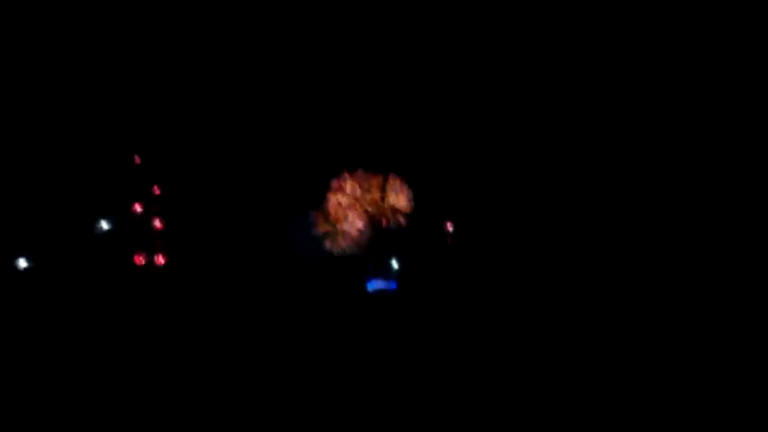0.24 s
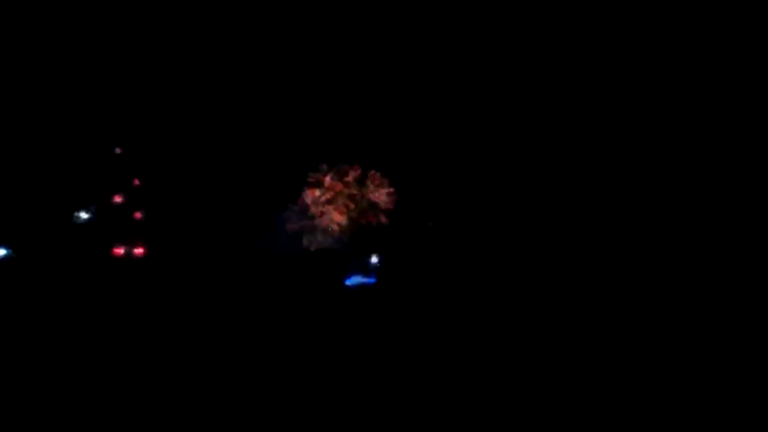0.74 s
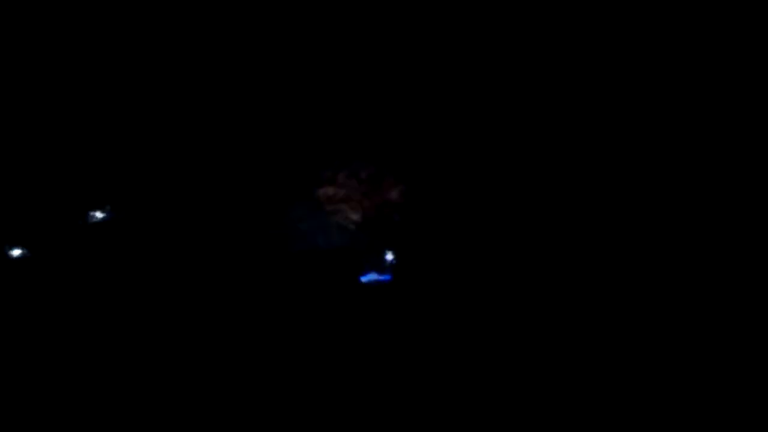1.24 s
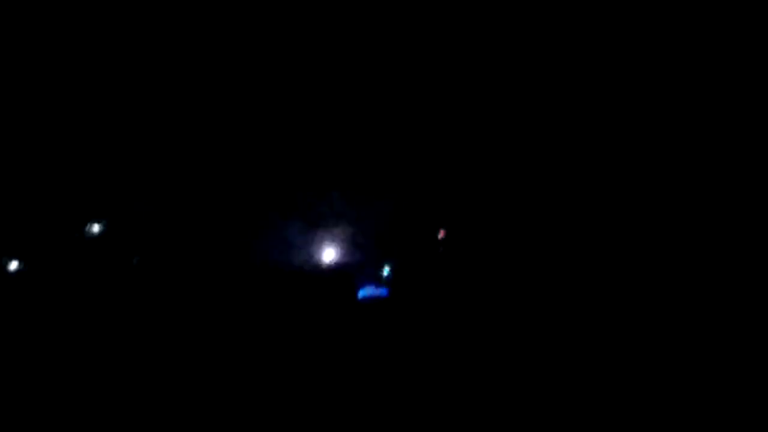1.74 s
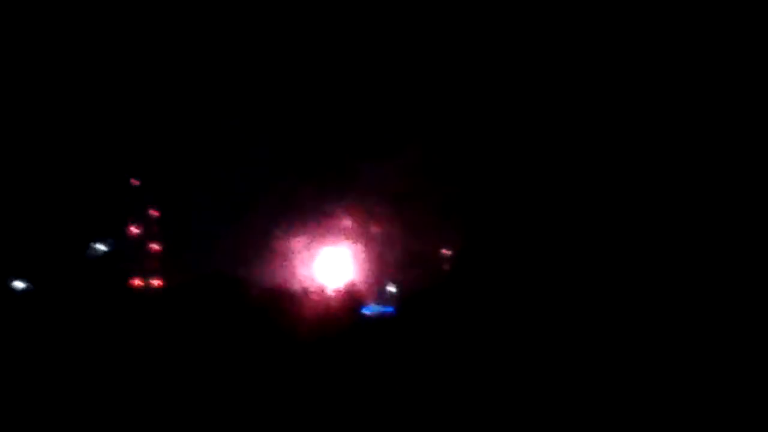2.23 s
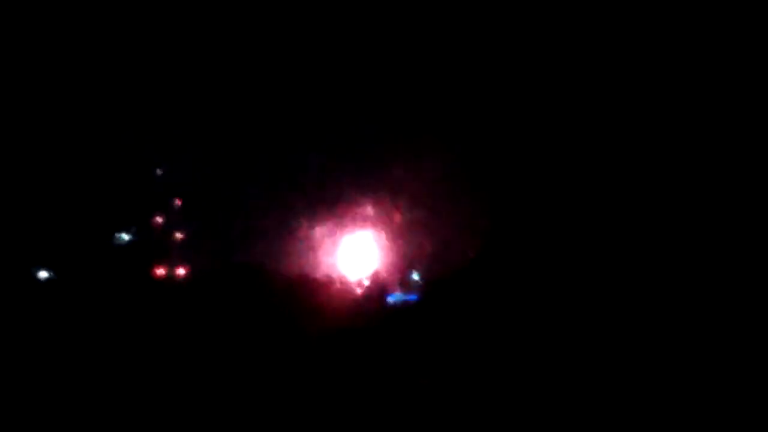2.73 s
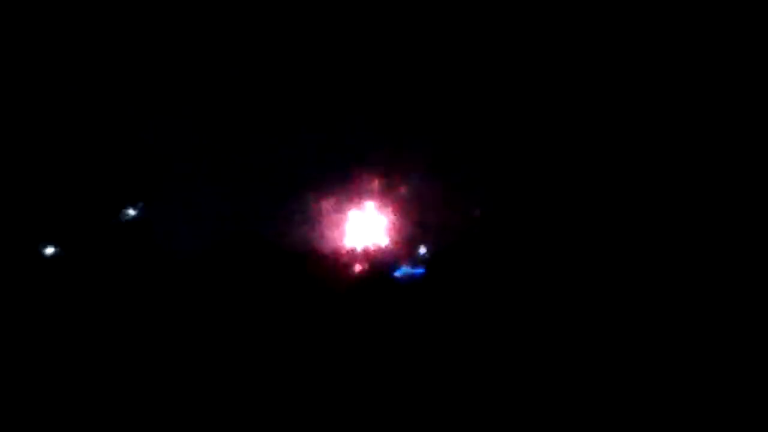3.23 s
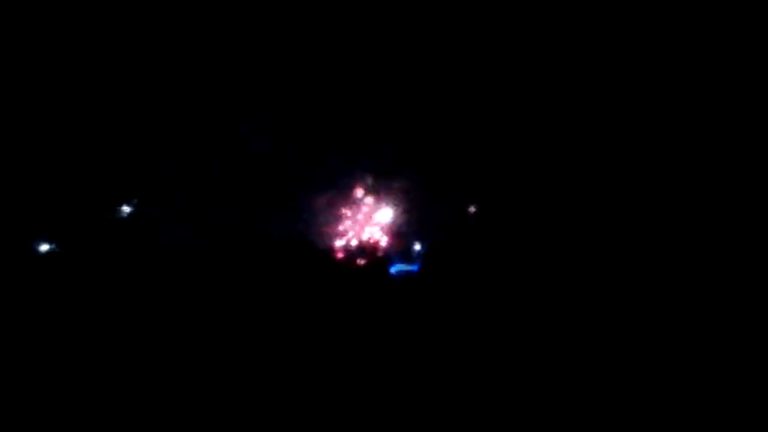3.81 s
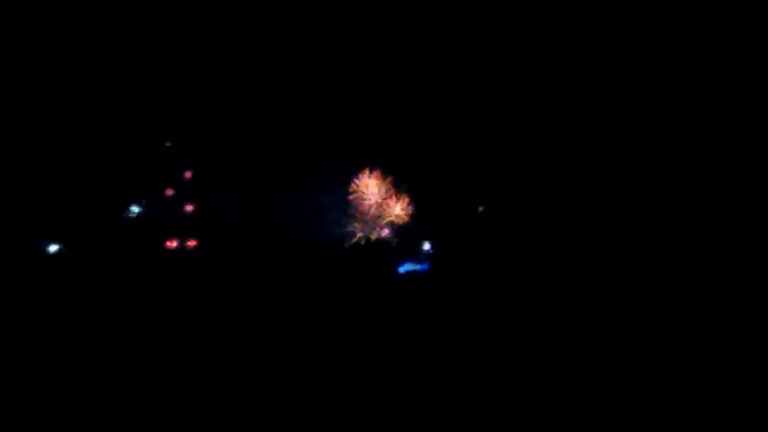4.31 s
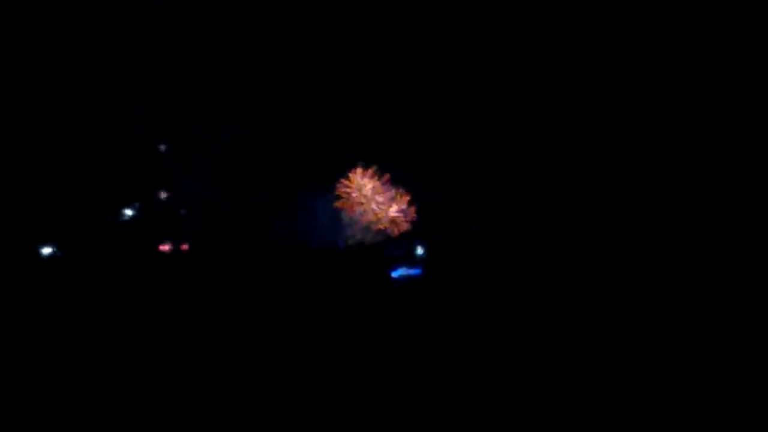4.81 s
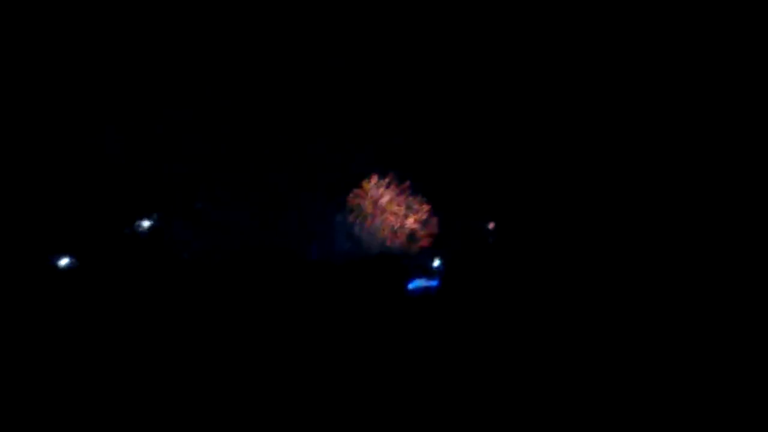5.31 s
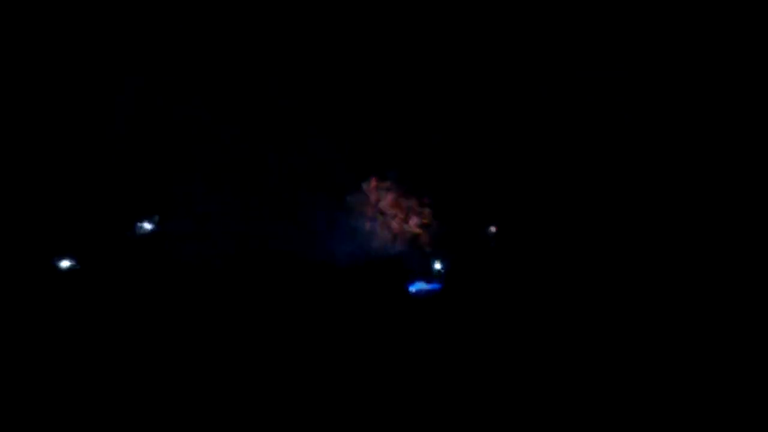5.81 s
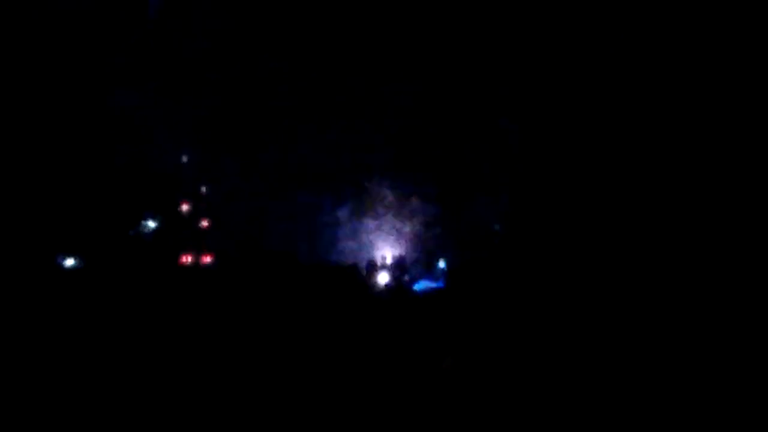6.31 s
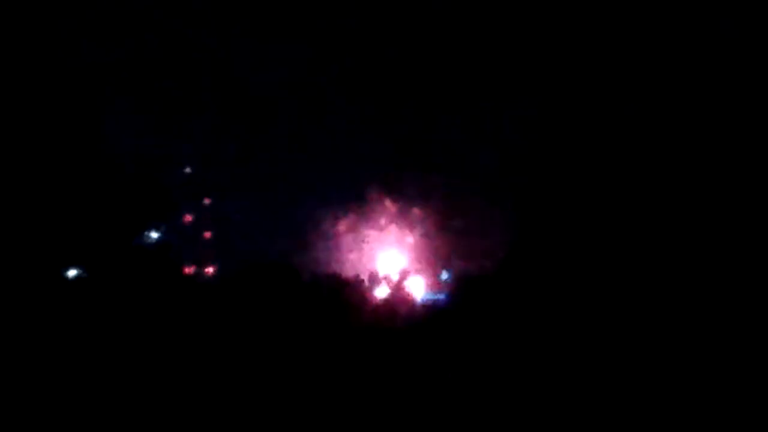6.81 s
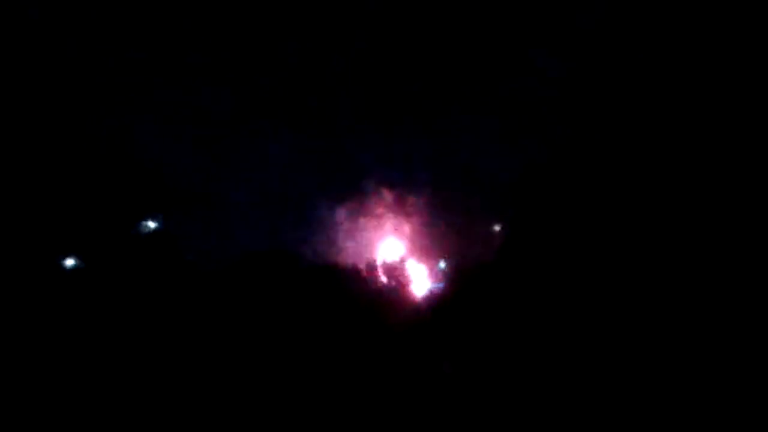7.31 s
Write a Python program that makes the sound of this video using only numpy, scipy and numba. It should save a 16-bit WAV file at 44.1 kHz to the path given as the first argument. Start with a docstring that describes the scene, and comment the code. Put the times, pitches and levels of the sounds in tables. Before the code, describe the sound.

Distant firework shells thump and crack at night in irregular clusters, echoing and rolling away over a low rumble, with camera hiss and motor whirr.

```python
"""Firework shells burst far off at night: each thump is a pressure pulse with a crack and clatter made of
scattered copies. It echoes from a house front and rolls away over a rumble of noise and random far thuds.
A small camera adds noise: steady hiss, narrow whines and short runs of its focus motor. Its gain control
ducks when a thump is too loud and creeps back up, so the quiet sounds swell between the bursts.
The bass is largely opposite in the two channels."""
import sys
import numpy as np
from scipy import signal
from scipy.fft import rfft, irfft
from scipy.io import wavfile
from scipy.ndimage import uniform_filter1d, minimum_filter1d
from numba import njit

SR = 44100
rng = np.random.default_rng(int(sys.argv[2]) if len(sys.argv) > 2 else 0)


def transcribe(signal):
    """Save signal, clipped to [-1, 1], as a 16-bit WAV file at the path in sys.argv[1]."""
    frames = np.atleast_2d(signal).T
    limited = np.clip(frames, -1, 1)
    pcm = np.round(limited * 32767).astype(np.int16)
    wavfile.write(sys.argv[1], SR, pcm)


N = 332955
TIME = np.arange(N) / SR  # seconds


def undb(db):
    """Turn decibels into a gain."""
    return 10 ** (np.asarray(db) / 20)


def unit(x):
    """Scale to an rms (average strength) of 1."""
    return x / np.sqrt(np.mean(x ** 2))


def colour(x, points, size=8192):
    """Filter through (Hz, dB) points without any sound ahead of time, built from the cepstrum of the gain."""
    hz, db = np.transpose(points)
    bins = np.maximum(np.arange(size // 2 + 1) * SR / size, 1)
    gain = undb(np.interp(np.log(bins), np.log(hz), db))
    cepstrum = irfft(np.log(gain))
    # folding the second half onto the first makes the filter respond as early as it can
    cepstrum[1:size // 2] *= 2
    cepstrum[size // 2 + 1:] = 0
    response = irfft(np.exp(rfft(cepstrum)))[:size // 2]
    return signal.fftconvolve(x, response)[:len(x)]


def noise(points):
    """Make noise of the given colour, rms 1."""
    return unit(colour(rng.standard_normal(N), points))


def band(x, hz, q):
    """Pass x through one resonance, gain 1 at its centre."""
    return signal.lfilter(*signal.iirpeak(hz, q, fs=SR), x)


def walk(rate):
    """Make random levels, held for 1 / rate seconds and smoothed twice; rms 1."""
    hold = int(SR / rate)
    steps = np.repeat(rng.standard_normal(N // hold + 1), hold)
    smooth = uniform_filter1d(uniform_filter1d(steps, hold), hold)
    return unit(smooth[:N])


def swell(start_s, length_s, attack_s, release_s):
    """Make an envelope that rises, holds until length_s after its start and dies away."""
    age = TIME - start_s
    rise = np.clip(age / attack_s, 0, 1)
    return rise * np.exp(-np.maximum(age - length_s, 0) / release_s)


def add(track, s, x):
    """Mix x into the track from time s on."""
    i = max(int(s * SR), 0)
    track[i:i + len(x)] += x[:max(N - i, 0)]


def scatter(x, start_s, decay_s, per_s):
    """Return x from many small reflectors, fainter with delay; as much energy as x."""
    delay = TIME[:len(x)]
    paths = rng.standard_normal(len(x)) * (rng.random(len(x)) < per_s / SR)
    paths = paths * (delay > start_s) * np.exp(-delay / decay_s)
    y = signal.fftconvolve(x, paths)[:len(x)]
    return y * np.sqrt(np.sum(x ** 2) / (np.sum(y ** 2) + 1e-18))


def whine(hz, width_hz):
    """Make noise ring in one narrow resonance, applied twice for steep sides; rms 1."""
    q = hz / (1.62 * width_hz)  # two passes narrow the band, so each starts wider
    return unit(band(band(rng.standard_normal(N), hz, q), hz, q))


# Colour of the hiss that both channels share. Each row: frequency in Hz, level in dB.
HISS_COMMON_COLOUR = [(500, 3), (2000, 7), (2700, -11), (3300, -2.5), (4300, 10.5), (4950, 17), (5500, 5),
                      (6200, -16.5), (7200, -4), (11000, -8.5), (12500, -9), (15500, -10.5)]
# Colour of the hiss that is opposite in the channels. Each row: frequency in Hz, level in dB.
HISS_OPPOSITE_COLOUR = [(500, -27), (1700, -2.5), (2600, -11), (3600, 1), (4500, -26), (5100, -3),
                        (5800, -11), (6800, -12), (7900, -19), (9500, -14), (12500, -21), (15000, -18)]
# Narrow whines of the camera body. Each row: frequency in Hz, width in Hz, level of the common part in dB,
# level of the opposite part in dB; the slow wavering below is added to both levels.
BODY_WHINES = [(1917, 117, -72, -98.5), (2259, 110, -72, -75), (2359, 68, -74, -71), (4024, 360, -82, -78),
               (4060, 47, -79.5, -82)]
# Slow wavering of the whines. Each row: time in seconds, change of level in dB.
WHINE_WAVER = [(0, -0.5), (1.4, 0), (3.3, 2), (3.8, -4), (5.4, -0.5), (7.55, 0.5)]


def camera(common_db=-69, opposite_db=-74):
    """Add the camera's steady hiss, as coloured noise, to its slowly wavering resonant whines."""
    common_hiss = undb(common_db) * noise(HISS_COMMON_COLOUR)
    opposite_hiss = undb(opposite_db) * noise(HISS_OPPOSITE_COLOUR)
    out = np.array([common_hiss, opposite_hiss])
    waver_db = np.interp(TIME, *np.transpose(WHINE_WAVER))
    for hz, width_hz, *levels_db in BODY_WHINES:
        out += np.array([undb(db + waver_db) * whine(hz, width_hz) for db in levels_db])
    return out


MOTOR_ATTACK_S, MOTOR_RELEASE_S = 0.02, 0.053
WHIRR_HZ, WHIRR_WIDTH_HZ = 4015, 260
# Rasp of the focus gears. Each row: frequency in Hz, level in dB.
RASP_COLOUR = [(1500, -30), (2050, 4), (2650, 11), (2950, 10), (3400, 3.5), (4350, 0), (6500, -4),
               (9000, -47)]
# Runs of the focus motor. Each row: start in seconds, length in seconds, level of the whirr in dB,
# level of the gear rasp in dB; both levels are those of the opposite part.
MOTOR_RUNS = [(0.24, 0.43, -68.5, -88), (1.165, 0.28, -67, -74), (1.99, 0.66, -72, -79),
              (2.596, 0.39, -64.5, -79), (3.178, 0.53, -78, -71), (3.82, 0.15, -89, -68.5),
              (4.264, 1, -74.5, -84), (4.851, 0.39, -67, -68.5), (5.125, 0.26, -68, -73.5),
              (6.77, 0.14, -73, -67), (7.033, 0.17, -67, -67), (7.24, 0.2, -65, -72)]


def focus_motor(common_db=-9):
    """The lens hunts in the dark in short runs: the motor whirrs in a narrow band and its gears rasp."""
    whirr, rasp = 0, 0
    for s, length_s, whirr_db, rasp_db in MOTOR_RUNS:
        running = swell(s, length_s, MOTOR_ATTACK_S, MOTOR_RELEASE_S)
        # where runs overlap, their powers add
        whirr = np.hypot(whirr, undb(whirr_db) * running)
        rasp = np.hypot(rasp, undb(rasp_db) * running)

    def one_part():
        """Make whirr and rasp from fresh noise."""
        return whirr * whine(WHIRR_HZ, WHIRR_WIDTH_HZ) + rasp * noise(RASP_COLOUR)

    return np.array([undb(common_db) * one_part(), one_part()])


# Level of the roll between volleys in dB, before its random surges; how fast a volley builds and dies.
ROLL_DB, VOLLEY_ATTACK_S, VOLLEY_RELEASE_S = -41.5, 0.051, 0.3
# Colour of the far rolling. Each row: frequency in Hz, level in dB.
FAR_ROLL_COLOUR = [(20, -20), (35, -17), (65, -5.5), (90, -2), (115, 0), (170, -2.5), (250, -8.5),
                   (400, -18.5), (630, -21.5), (820, -30.5), (1100, -35.5), (1600, -60), (3000, -94)]
# Airy top of the rolling, the same in both channels. Each row: frequency in Hz, level in dB.
AIRY_COLOUR = [(100, -14), (350, -7), (600, -0.5), (1100, 1), (1500, -1.5), (1800, -6.5), (2200, -21.5),
               (2800, -25), (6000, -53.5)]
# Volleys of far shells that swell the rolling. Each row: start in seconds, length in seconds, level in dB
# before the random surges.
FAR_VOLLEYS = [(0.703, 1, -47.5), (2.378, 0.53, -40.5), (3.18, 0.6, -41), (4.5, 0.72, -44),
               (5.241, 0.25, -40.5), (6.123, 0.18, -38.5), (6.57, 0.36, -39), (7.22, 0.1, -44.5)]


def rumble(thuds_per_s=90, thud_db=-5, surge_db=1.34, air_db=-64.0, air_follow=0.48):
    """Countless far thuds merge into a low roll that grows with each volley; a faint airy rush swells too."""
    power = undb(ROLL_DB) ** 2
    for s, length_s, db in FAR_VOLLEYS:
        volley = undb(db) * swell(s, length_s, VOLLEY_ATTACK_S, VOLLEY_RELEASE_S)
        power = power + volley ** 2
    level_db = 10 * np.log10(power)
    thuds = (rng.random(N) < thuds_per_s / SR) * rng.standard_normal(N)
    coloured_thuds = unit(colour(thuds, FAR_ROLL_COLOUR))
    low = unit(noise(FAR_ROLL_COLOUR) + undb(thud_db) * coloured_thuds)
    # the air swells by only a share of what the roll does
    air_level_db = air_db + air_follow * (level_db - level_db.mean()) + 0.24 * walk(17)
    air = noise(AIRY_COLOUR) * undb(air_level_db)
    return np.array([air, low * undb(level_db + surge_db * walk(18))])


def lag_lows(x, hz, q):
    """All-pass: along the ground the lows arrive after the highs, so a thump falls in pitch."""
    return x - 2 * band(x, hz, q)


# Fainter shells are further off and duller: the level that arrives without this loss,
# and the dB per octave lost for each dB under it.
NEAR_DB, DULLING = 2, 0.15
LAG_HZ, LAG_Q = 145, 0.742  # the lows that the ground delays
# What distance and ground leave of a blast. Each row: frequency in Hz, level in dB.
BLAST_COLOUR = [(25, -44.5), (60, -10), (100, -2), (140, 3), (250, -1.5), (380, -8), (620, -9), (800, -17),
                (1100, -19), (1400, -23.5), (2500, -41), (6000, -36), (15000, -73)]


def blast(peak_db, push_ms, treble_db, size=12288, knee_hz=200):
    """A jump in pressure and a suction; shells that are further off or screened lose more treble."""
    age = TIME[:size] * 1000 / push_ms
    pulse = (age - 1) * np.exp(-age)
    tilt_db = DULLING * (peak_db - NEAR_DB) + treble_db  # per octave above the knee
    path = [(hz, db + tilt_db * np.log2(max(hz / knee_hz, 1))) for hz, db in BLAST_COLOUR]
    return lag_lows(colour(pulse, path), hz=LAG_HZ, q=LAG_Q)


ECHO_S = .0608  # from the thump to its echo
KNOCK_DB, KNOCK_Q = 1, 2.67
CLATTER_BASS_LOSS = 0.45  # share of the bass that the clatter lacks
SMEAR_REF_MS = 9.6  # an echo smeared this long keeps half of its clean slap
# Shell bursts. Each row: start in seconds, peak of the thump in dB before crack, clatter and later colouring,
# length of the overpressure in ms, rough crack in dB, clatter of near reflections in dB, house-front echo
# in dB, smear of that echo in ms, pitch of the hollow knock in Hz, extra treble tilt in dB per octave.
SHELL_BURSTS = [(.983, -15.5, 0.9, 2.5, 0.5, -5.5, 4.7, 368, 0),
                (1.157, -26, 3.9, -10, -4, -18, 12, 400, -5), (1.197, -29, 2.5, -10, 0, -14, 12, 280, -6),
                (1.3702, -8, 3.1, 2, -7, -6.5, 9.4, 840, 0.5),
                (1.5507, -9.5, 0.99, 1.5, -5, -9.5, 4.8, 390, .5),
                (2.505, -30, 4.9, -9, -11, -17.5, 12, 405, -3),
                (2.641, -26.5, 2.4, -3, -17, -13, 12, 440, -4), (2.755, -30, 4.6, -12, 1, -12, 15, 397, -3),
                (2.878, -34, 4.3, -15, 4, -14, 11, 395, -4), (2.955, -33.5, 1.3, -9.5, 2, -4, 16, 600, 3),
                (2.975, -26, 6.6, -12, -16, -8, 12, 600, 0), (2.993, -27.5, 4.9, -3, -1, -14, 12, 600, 1),
                (3.181, -32, 2.1, -2, -5, -2, 12, 500, 1.5), (3.316, -28, 6.2, -3, -17, -7, 10, 600, -5),
                (3.352, -7, 30, 4, -1, -6.5, 14, 910, -2.5), (3.4713, -3, 19, -0.5, -12, -12, 26, 880, 1.5),
                (3.487, -7.5, 13, 1, -6, -6, 41, 900, 0), (5.295, -17.5, 3.5, -33, -10, -10, 25, 525, -2.5),
                (5.311, -26.5, 4.6, -3, 2.5, -3.5, 22, 620, 2.5),
                (5.358, -26, 4.5, 1, -3, -4, 28, 590, 3.5), (5.802, -15, 1.22, 4, 0.5, -4.5, 33, 510, 0),
                (6.122, -15, 0.68, -1, -7, -8, 22, 480, -1),
                (6.1724, -13.5, 2.2, 2.5, -3, -4.5, 11, 800, 0.5),
                (6.307, -23.5, 2.8, -5, -2, -3.5, 15, 393, -2),
                (6.551, -26, 4.1, -4, 3.5, -10.5, 16, 418.6, 1),
                (6.624, -27, 3.2, -6, 8, -10, 13, 406, -0.5), (6.705, -33, 6, -10, 8, -9, 12, 400, -4.5),
                (6.772, -25.5, 2.8, -10, -5, -14, 16, 400, -7.5),
                (7.276, -27, 8.6, -9, -3.5, -5, 19, 600, -6), (7.511, -21, 15, -18, -7, -20, 12, 600, -9)]


def shells(smear_db=0, slap_db=-3, tail_db=-4):
    """Each burst is a ragged thump with clatter from nearby, then a smeared slap and a grainy roll."""
    direct, echo = np.zeros(N), np.zeros(N)
    for s, peak_db, push_ms, crack_db, clatter_db, echo_db, smear_ms, knock_hz, treble_db in SHELL_BURSTS:
        wave = blast(peak_db, push_ms, treble_db)
        # closely spaced reflections reinforce one band: a hollow knock
        knock = wave + undb(KNOCK_DB) * band(wave, knock_hz, q=KNOCK_Q)
        size = undb(peak_db) / np.abs(knock).max()
        # the front arrives by several paths within a few ms, which tears it into a rough crack
        crack_band = band(knock, 810, q=0.92)
        crack = undb(crack_db) * scatter(crack_band, start_s=0.0013, decay_s=0.013, per_s=5500)
        # small things nearby throw back less of the bass
        bright = knock - CLATTER_BASS_LOSS * band(knock, 89, q=0.51)
        clatter = undb(clatter_db) * scatter(bright, start_s=0.006, decay_s=0.018, per_s=2700)
        add(direct, s, size * (knock + crack + clatter))
        # the more slantwise a shell meets the uneven house front, the less is left of a clean slap
        clean = undb(slap_db) / (1 + smear_ms / SMEAR_REF_MS)
        smear_band = band(knock, 510, q=0.35)
        smear = scatter(smear_band, start_s=0.0005, decay_s=smear_ms / 1000, per_s=4000)
        slap = clean * knock + undb(smear_db) * smear
        # roofs and trees behind it answer later and blend together
        tail_band = band(wave, 860, q=0.21)
        tail = undb(tail_db) * scatter(tail_band, start_s=0.025, decay_s=0.09, per_s=1200)
        add(echo, s + ECHO_S, size * undb(echo_db) * (slap + tail))
    return direct, echo


def landscape(x, t60_s, swell_s):
    """Late, patchy echoes from trees and hills: x through fading noise of unit energy."""
    patches = rng.standard_normal(N) * undb(2.9 * walk(28.4))
    tail = patches * (1 - np.exp(-TIME / swell_s)) * np.exp(-np.log(1000) * TIME / t60_s)
    return signal.fftconvolve(x, tail / np.sqrt(np.sum(tail ** 2)))[:N]


# Share of a blast that the two channels have in common. Each row: frequency in Hz, level in dB.
COMMON_BLAST_COLOUR = [(30, -68.5), (300, -26), (600, -17.5), (1000, -10), (1500, -4.5), (2500, 7),
                       (15000, -19)]
# Colour of the echo that both channels share. Each row: frequency in Hz, level in dB.
COMMON_ECHO_COLOUR = [(100, -29), (250, -21), (400, -12.5), (600, -12), (850, -.5), (1250, 7.5), (1700, 10),
                      (2300, 7), (3000, -33), (6000, -62)]
# Colour of the echo that is opposite in the channels. Each row: frequency in Hz, level in dB.
OPPOSITE_ECHO_COLOUR = [(100, 1.5), (200, 2), (400, -9.5), (700, -6), (1300, -5), (2600, -21)]


def bursts(late_common_db=-9, late_opposite_db=-14):
    """Thumps, echoes and late echoes; the crisp part of the echoes comes from straight ahead."""
    direct, echo = shells()
    returned = colour(echo, COMMON_ECHO_COLOUR)
    late_common = undb(late_common_db) * landscape(returned, t60_s=1.42, swell_s=0.052)
    common = colour(direct, COMMON_BLAST_COLOUR) + returned + late_common
    late_opposite = undb(late_opposite_db) * landscape(direct, t60_s=1.0, swell_s=0.05)
    opposite = direct + colour(echo, OPPOSITE_ECHO_COLOUR) + late_opposite
    return np.array([common, opposite])


def scene(imbalance=0.093):
    """Add the common part to both channels and the opposite part with flipped sign, a little louder left."""
    common, opposite = camera() + focus_motor() + rumble() + bursts()
    left = common + (1 + imbalance) * opposite
    right = common - (1 - imbalance) * opposite
    return np.array([left, right])


@njit
def gain_control(peak_db, start_db, most_db, ceiling_db, attack_s, release_db_per_s):
    """Gain in dB: falls fast while the output is over the ceiling, then climbs steadily up to most_db."""
    out, gain = np.empty(len(peak_db)), start_db
    for i in range(len(peak_db)):
        over = peak_db[i] + gain - ceiling_db
        if over > 0:
            gain -= over / (attack_s * SR)
        else:
            gain = min(gain + release_db_per_s / SR, most_db)
        out[i] = gain
    return out


TOP_HZ = 15400


def record(dry, start_db=9.0, most_db=21.0, release_db_per_s=9):
    """Gain control takes about a millisecond to react, so big thumps can clip before it ducks; steep top cut."""
    ceiling_db, attack_s = -.8, .001
    # loudest sample of either channel in a 3 ms window, most of it in the past
    peak = -minimum_filter1d(-np.abs(dry).max(axis=0), size=133, origin=50)
    peak_db = 20 * np.log10(peak + 1e-9)
    gain_db = gain_control(peak_db, float(start_db), float(most_db), ceiling_db, attack_s,
                           float(release_db_per_s))
    clipped = np.clip(dry * undb(gain_db), -.985, .985)
    top_cut = signal.ellip(12, .1, 80, TOP_HZ, fs=SR, output="sos")
    return signal.sosfilt(top_cut, clipped)


dry = scene()
out = record(dry)
transcribe(out)
```